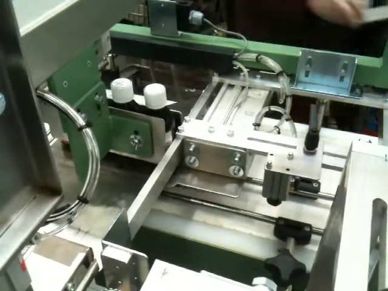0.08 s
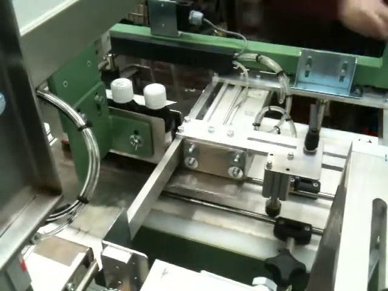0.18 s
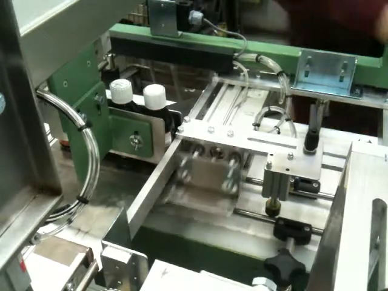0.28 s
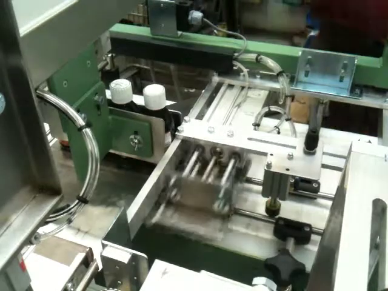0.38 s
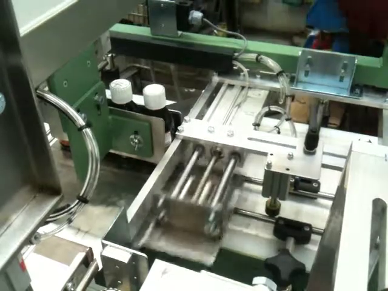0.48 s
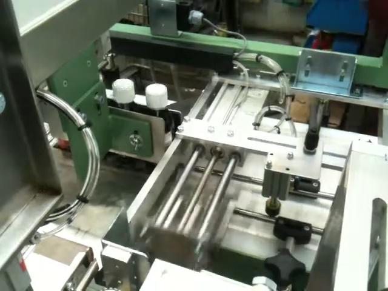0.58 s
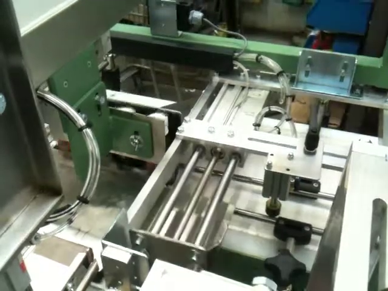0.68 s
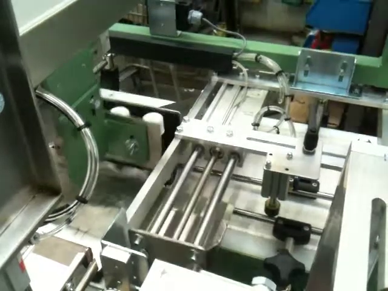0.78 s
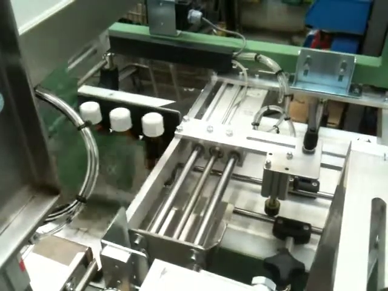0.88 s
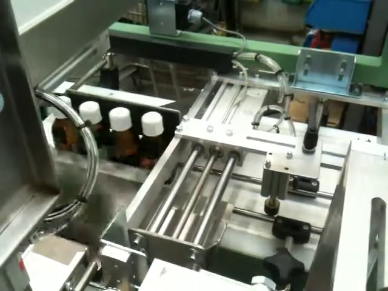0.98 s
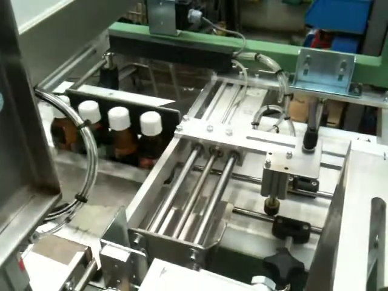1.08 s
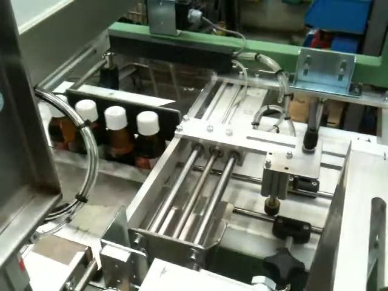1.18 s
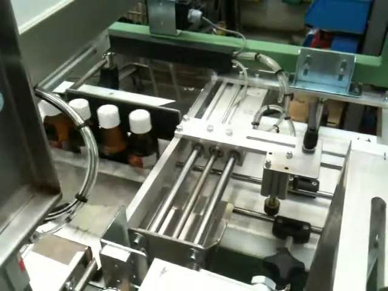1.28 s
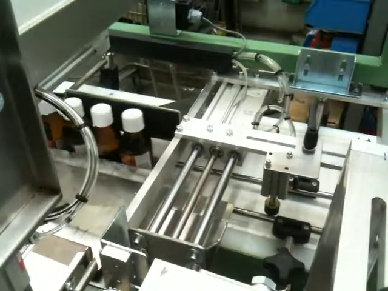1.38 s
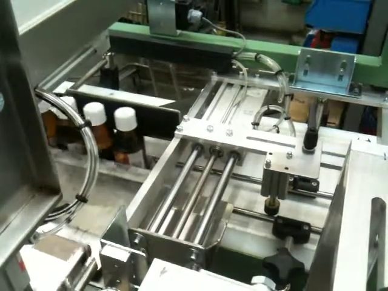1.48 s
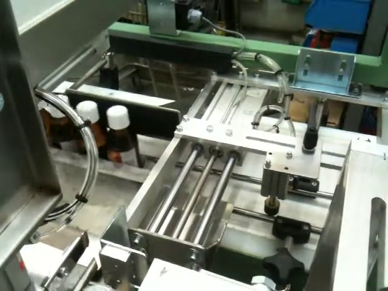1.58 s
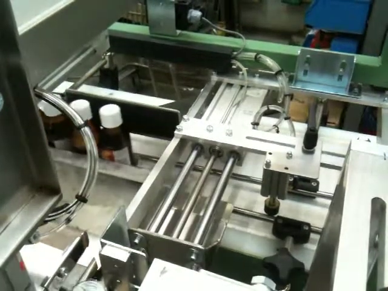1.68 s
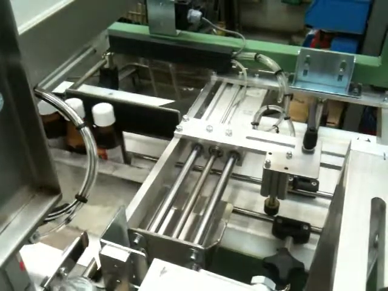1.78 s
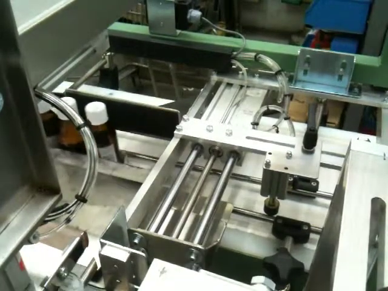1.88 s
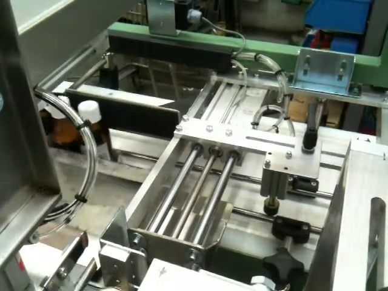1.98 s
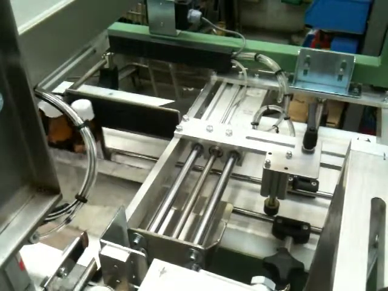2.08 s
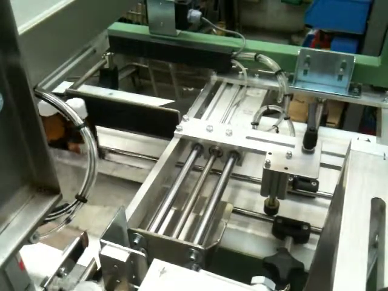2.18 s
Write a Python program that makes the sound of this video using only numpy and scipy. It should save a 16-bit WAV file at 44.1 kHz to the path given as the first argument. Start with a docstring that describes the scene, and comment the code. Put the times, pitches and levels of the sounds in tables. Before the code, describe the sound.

A pneumatic machine pushes glass bottles along metal guides. Sharp knocks and venting air start at 0.23 s, with light rattling. A hissing rush from 0.6 s ends in the loudest bang at 0.8 s, with bright glass clinks. Bottles rattle, tick and squeak until 1.4 s. An air puff at 1.5 s leads to a ringing metal clank at 1.6 s, then smaller knocks and clinks. Close, thin-bass microphone; faint workshop hum.

```python
"""A pneumatic machine shifts glass bottles along metal guides in a workshop, heard from close by.
Its knocks are noise bursts with a frame ring; valves vent and a slide rushes to its stop as coloured noise.
Blows ring a pusher plate and touches ring the bottles, both as decaying sines; clicks swell into the rattle.
Glass squeaks on the rail as wandering tones. Behind it lie the room's tail and the steady noise of the hall.
A small microphone thins the deep bass, rounds the peaks and cuts the top."""
import sys
import numpy as np
from scipy import signal
from scipy.fft import rfft, irfft
from scipy.io import wavfile
from scipy.ndimage import uniform_filter1d

SR = 44100
rng = np.random.default_rng(int(sys.argv[2]) if len(sys.argv) > 2 else 0)


def wrap_up_sound(samples):
    """Save the sound to the file named by the first command line argument, as 16-bit audio."""
    columns = np.atleast_2d(samples).T
    # keep every value between -1 and 1, then stretch to whole-number steps
    tamed = np.clip(columns, -1, 1)
    steps = np.round(tamed * 32767).astype(np.int16)
    wavfile.write(sys.argv[1], SR, steps)


N = 97020

# ringing modes of a glass bottle: f/Hz, level/dB, t60/s
BOTTLE_MODES = [(2070, -2, .1), (2230, -4, .1), (3470, -3, .12), (3517, 0, .18), (3560, -6, .1),
                (3750, -9, .12), (5042, -3, .1), (5110, -5, .07), (6150, -3, .04), (7200, -3, .06),
                (7890, -7, .06), (8950, -3, .06), (9150, -5, .05), (10600, -4, .05), (11700, -4, .06)]
# for plate blows and bottle touches: random spread of mode level, and of pitch as a fraction
MODE_SCATTER_DB, MODE_DETUNE = 2, .002


def undb(db):
    """Amplitude factor for a level in dB."""
    return 10 ** (np.asarray(db) / 20)


def unit(x):
    """Scale to an RMS of one."""
    return x / np.sqrt(np.mean(x ** 2))


def unit_energy(x):
    """Scale a response to a total energy of one."""
    return x / np.sqrt(np.sum(x ** 2))


def noise():
    """White noise over the whole scene."""
    return rng.standard_normal(N)


def decay(t, t60):
    """Exponential fade that falls 60 dB in t60 seconds."""
    return 1000. ** (-t / t60)


def band(x, hz, order=4):
    """Keep what lies between two frequencies."""
    return signal.sosfilt(signal.butter(order, hz, "bandpass", fs=SR, output="sos"), x)


def curve(rows, axis=1):
    """A column joined by straight lines in time, and a gate that is silent outside its span."""
    r, t = np.array(rows), np.arange(N) / SR
    to_nearest_end = np.minimum(t - r[0, 0], r[-1, 0] - t)
    gate = np.clip(to_nearest_end / .004, 0, 1)  # 4 ms fades
    return np.interp(t, r[:, 0], r[:, axis]), gate


def played(x, rows):
    """A steady sound made to follow a level curve."""
    db, gate = curve(rows)
    return unit(x) * undb(db) * gate


def colour(x, table):
    """Shape a spectrum by dB points joined over log frequency."""
    r = np.array(table)
    f = np.arange(N // 2 + 1) * SR / N + 1  # 1 Hz up, so that the log exists
    db = np.interp(np.log(f), np.log(r[:, 0]), r[:, 1])
    return irfft(rfft(x) * undb(db), N)


def ring(modes, scatter_db=0., detune=0., favour_hz=1000., favour_db_per_oct=0.):
    """Response of a struck object: decaying sines, weaker away from the favoured pitch."""
    t = np.arange(SR // 2) / SR
    out = np.zeros(len(t))
    for hz, db, t60 in modes:
        level_draw, pitch_draw = rng.standard_normal(2)
        octaves_off = abs(np.log2(hz / favour_hz))
        level = undb(db + scatter_db * level_draw - favour_db_per_oct * octaves_off)
        tone = np.sin(2 * np.pi * hz * (1 + detune * pitch_draw) * t)
        out += level * tone * decay(t, max(t60, .01))
    return out


def rung(x, rows, response):
    """An excitation that follows a level curve sets a ringing response going."""
    ringing = signal.fftconvolve(played(x, rows), unit_energy(response))[:N]
    return band(ringing, (600, 14000))


def add(out, s, x):
    """Place a sound at s seconds, cut off at the end of the scene."""
    i = int(s * SR)
    out[i:i + len(x)] += x[:N - i]


def knocks():
    """Each blow of the mechanism is a snap with a short crack, a thud and a ring of the frame."""
    # blows: t/s, crack level/dB, bass level/dB, treble level/dB, crack t60/s, bass t60/s, crack centre f/Hz
    blows = [(0.2333, -20, -25, -18, 0.022, 0.041, 1190), (.238, -33, -31.5, -15.5, 0.017, 0.042, 920),
             (0.3167, -21.5, -50, -19, 0.082, .06, 2250), (.355, -24, -52, -22, 0.064, .05, 1510),
             (.372, -26.5, -35.5, -38, 0.16, 0.032, 1130), (0.8009, -14, -19.5, -14.5, .14, 0.098, 1480),
             (.855, -27.5, -22.5, -26, 0.088, 0.04, 1180), (1.296, -34, -48, -47, 0.11, 0.034, 790),
             (1.535, -37, -30, -39, 0.16, 0.15, 2420), (1.599, -17.5, -30, -18, 0.066, 0.079, 834),
             (1.755, -31, -36, -43, 0.1, 0.037, 2040), (1.794, -26.5, -44, -30, 0.069, 0.048, 1960),
             (1.844, -22.5, -47, -47, 0.01, 0.041, 1850), (2.005, -33, -37.5, -33, 0.04, 0.066, 2510),
             (2.059, -22.5, -37, -39, 0.026, .06, 1410), (2.078, -45, -34, -52.5, 0.046, 0.048, 700),
             (2.097, -53, -34, -44, 0.027, 0.024, 760)]
    # ringing modes of the machine frame: f/Hz, level/dB, t60/s
    frame_modes = [(205, -2, .08), (252, -4, .12), (346, 0, .25), (528, -4, .3), (850, -12, .1),
                   (1200, -7, .18), (2350, -8, .12)]
    bass_hz, treble_hz = (162, 454), (3700, 10800)
    crack_half_width_oct, treble_fade_ratio = 0.83, 0.23
    snap_db, attack_s, shortest_t60_s = 6, .0004, .015
    frame_db = -10.5  # relative to the bass of the blow
    out, t = np.zeros(N), np.arange(SR // 2) / SR
    for s, crack_db, bass_db, treble_db, crack_t60, bass_t60, crack_hz in blows:
        width = 2 ** crack_half_width_oct
        parts = [(bass_hz, bass_db, bass_t60),
                 ((crack_hz / width, crack_hz * width), crack_db, crack_t60),
                 (treble_hz, treble_db, crack_t60 * treble_fade_ratio)]
        for hz, db, t60 in parts:
            env = (1 - np.exp(-t / attack_s)) * decay(t, max(t60, shortest_t60_s))
            # share of the full spectrum, so that narrow bands are not quieter
            share = (hz[1] - hz[0]) / (SR / 2)
            snap = undb(snap_db) * (t == 0) / np.sqrt(share) / 2
            blow = rng.standard_normal(len(t)) * env + snap
            add(out, s, undb(db) * band(blow, hz, order=2) / np.sqrt(share))
        frame = band(ring(frame_modes, 2, .002), (150, 6000), order=2)
        add(out, s, undb(bass_db + frame_db) * frame)
    return out


def vents():
    """Air leaves the valves in puffs of coloured noise."""
    # one level curve for each stretch of venting: t/s, level/dB
    puffs = [
        [(0.233, -34), (0.237, -26), (0.301, -29), (0.319, -25.5), (0.339, -29), (0.353, -27), (0.457, -38),
         (0.61, -38)],
        [(1.507, -52), (1.515, -33), (1.531, -31), (1.569, -37), (1.593, -37), (1.6, -21)],
    ]
    # spectrum of the escaping air: f/Hz, level/dB per Hz
    air_spectrum = [(180, -27), (300, -6), (667, -10), (961, -14), (1150, -6.5), (1690, -10), (2480, -10.5),
                    (3350, -17.5), (6520, 0), (12500, -9), (16000, -21)]
    return sum(played(colour(noise(), air_spectrum), puff) for puff in puffs)


def rush():
    """Hiss of the slide on its way to the stop, ringing its guide rods."""
    # the rush: t/s, level/dB
    rush_level = [(0.59, -41), (0.652, -18), (0.678, -17), (0.768, -33.5), (0.794, -33.5), (0.8, -10)]
    # spectrum of the hiss: f/Hz, level/dB per Hz
    hiss_spectrum = [(88, -52), (150, -22), (312, -13.5), (364, -17), (589, -8.5), (866, -7.5),
                     (4460, -5.5), (9450, -11), (12900, -30.5), (15000, -47)]
    # ringing modes of the guide rods: f/Hz, level/dB, t60/s
    rod_modes = [(1844, -6, .06), (2464, 0, .1), (2931, -4, .1), (3463, -5, .07), (4412, -4, .05),
                 (6652, -5, .07)]
    rods_db = -6
    hiss = played(colour(noise(), hiss_spectrum), rush_level)
    return hiss + undb(rods_db) * rung(noise(), rush_level, ring(rod_modes))


def plate():
    """Blows ring the pusher plate; the point of contact decides which modes answer most."""
    # blows on the plate: t/s, level/dB, favoured f/Hz
    plate_blows = [(1.602, -21.5, 1620), (1.602, -13.5, 7800), (1.626, -22.5, 2600), (1.656, -24, 1810),
                   (1.755, -30.5, 2260), (1.792, -32.5, 2190), (1.815, -28, 1710), (1.843, -38.5, 2440)]
    # ringing modes of the plate: f/Hz, level/dB, t60/s
    plate_modes = [(1400, -7, .08), (1531, -3, .16), (1793, 0, .18), (1850, -6, .1), (2190, -2, .12),
                   (2310, -5, .1), (2785, -3, .16), (3805, -8, .15), (6611, -12, .12), (6900, -12, .1),
                   (7620, -8, .12), (8150, -7, .18), (10770, -13, .08)]
    favour_db_per_oct = 9.5
    out = np.zeros(N)
    for s, db, hz in plate_blows:
        add(out, s, undb(db) * ring(plate_modes, MODE_SCATTER_DB, MODE_DETUNE, hz, favour_db_per_oct))
    return band(out, (600, 14000), order=2)


def clinks():
    """Every touch excites the bottle modes in its own proportions."""
    # touches: t/s, level/dB, favoured f/Hz
    touches = [(.803, -11, 7300), (.812, -22, 3515), (.812, -20, 5070), (.858, -24, 3515),
               (.931, -25.5, 4830), (.931, -31, 11000), (.98, -38, 3515), (.988, -28, 6200),
               (1.0, -30, 2120), (1.042, -38, 9000), (1.055, -32, 2080), (1.166, -36, 2080),
               (1.29, -36, 7200), (1.315, -34, 7300), (1.365, -40.5, 7200), (1.712, -55, 9000),
               (1.81, -31, 5042), (1.845, -47, 3515), (2.045, -32.5, 8900), (2.09, -42.5, 3515)]
    favour_db_per_oct = 24
    out = np.zeros(N)
    for s, db, hz in touches:
        add(out, s, undb(db) * ring(BOTTLE_MODES, MODE_SCATTER_DB, MODE_DETUNE, hz, favour_db_per_oct))
    return out


def ticks():
    """Dry ticks high in the treble: short fading bursts of noise."""
    # ticks: t/s, level/dB
    tick_rows = [(1.0385, -34), (1.1418, -27), (1.1674, -40), (1.198, -28.5), (1.284, -35), (1.3144, -38),
                 (1.3636, -39.5), (1.996, -48), (2.043, -39)]
    t60_s, tick_hz = .035, (8600, 15500)
    out, t = np.zeros(N), np.arange(SR // 10) / SR
    for s, db in tick_rows:
        burst = rng.standard_normal(len(t)) * decay(t, t60_s)
        add(out, s, undb(db) * band(burst, tick_hz))
    return out


def jostle():
    """Bottles jostling keep their modes humming: noise drives the bottle response."""
    # one level curve for each stretch of jostling: t/s, level/dB
    stretches = [
        [(0.81, -26.5), (0.872, -39), (0.908, -59), (0.994, -35.5), (1.18, -60), (1.268, -66), (1.3, -50)],
        [(1.78, -47), (1.814, -33), (1.964, -66), (2.026, -47), (2.04, -42.5), (2.094, -44.5), (2.2, -59)],
    ]
    favour_hz, favour_db_per_oct = 3515, 3.
    return sum(rung(noise(), rows, ring(BOTTLE_MODES, 0, 0, favour_hz, favour_db_per_oct))
               for rows in stretches)


def clicks(per_s, spread_db):
    """Random clicks with a long tail of loud ones."""
    present = rng.random(N) < per_s / SR
    return present * np.sign(noise()) * undb(spread_db * rng.exponential(size=N))


def rattle():
    """Bottles along the rail: dense small impacts, with bass and treble of their own level."""
    # one curve for each stretch: t/s, middle level/dB, bass above it level/dB, treble above it level/dB
    stretches = [
        [(0.317, -41.5, -8, 4), (0.377, -34.5, 0, -1), (0.401, -37, -20, -0.5), (0.445, -38, -18, -2),
         (0.491, -40, -7.5, 0.5), (0.541, -44, -28, 4.5), (0.6, -45.5, -22, 2)],
        [(0.803, -34, 13, 18), (0.853, -28, -2, -1), (0.907, -32.5, -0.5, -4), (1.081, -39.5, -4.5, -3),
         (1.193, -37.5, -6.5, -2), (1.275, -40.5, -19, -5), (1.299, -38.5, -1.5, -3), (1.359, -46.5, 1, -3),
         (1.495, -54.5, 6, -5), (1.5, -36, -3, -26)],
        [(1.603, -46.5, 17, 24), (1.681, -33, -4, 3.5), (1.729, -32, -3, -6), (1.767, -32.5, -7, -19),
         (1.811, -36, -1.5, 0), (1.935, -45.5, 1, -9.5), (2.041, -43, -5, -1.5), (2.061, -50, 16.5, -5),
         (2.073, -47, 8.5, 3.5), (2.119, -41.5, 0, -6.5), (2.2, -50.5, 4.5, -5)],
    ]
    # colour of the rattle: f/Hz, level/dB per Hz
    rail_spectrum = [(59, -30), (100, -9), (208, 3), (425, -3), (524, -4.5), (688, -4), (2130, -2.5),
                     (3250, -6.5), (9070, -7), (15000, -32.5)]
    # bands of middle, bass and treble: lower f/Hz, upper f/Hz
    rail_bands = (523, 2830), (107, 830), (3220, 16300)
    impacts_per_s, spread_db, grain_s = 2300, 2, 0.006
    grain = np.exp(-np.arange(SR // 50) / (grain_s * SR))
    size = signal.fftconvolve(np.abs(clicks(impacts_per_s, spread_db)), grain)[:N]
    middle, bass, treble = [unit(band(colour(size * noise(), rail_spectrum), hz, order=2))
                            for hz in rail_bands]
    out = np.zeros(N)
    for rows in stretches:
        out += played(middle, rows)
        out += played(bass, rows) * undb(curve(rows, axis=2)[0])
        out += played(treble, rows) * undb(curve(rows, axis=3)[0])
    return out


def wavering(hz, width_hz):
    """A tone whose size and phase wander."""
    k = int(SR / width_hz)
    a, b = (unit(uniform_filter1d(uniform_filter1d(noise(), k), k)) for _ in range(2))
    wander = a + 1j * b + .5  # the .5 is a steady part
    return unit(np.real(wander * np.exp(2j * np.pi * np.cumsum(hz) / SR)))


def squeaks():
    """Stick-slip of glass on steel: a beating pair of tones and brief glides."""
    # the long squeak: t/s, f/Hz, level/dB
    squeak_rows = [(1.1, 1265, -49), (1.125, 1288, -37), (1.15, 1375, -40.5), (1.18, 1448, -40),
                   (1.215, 1412, -37), (1.25, 1366, -36.5), (1.275, 1382, -35), (1.305, 1456, -42),
                   (1.33, 1400, -42), (1.37, 1400, -45), (1.41, 1410, -56)]
    # gliding chirps: t/s, length/s, start f/Hz, end f/Hz, level/dB
    chirp_rows = [(.44, .15, 1450, 1750, -45), (.93, .09, 1800, 3050, -36), (1.04, .055, 6250, 6600, -42),
                  (1.11, .045, 3720, 3800, -41), (1.22, .06, 6700, 6200, -50)]
    width_hz, chirp_width_hz = 75, 85
    twin_offset_hz, twin_db = -105, -1
    hz = curve(squeak_rows)[0]
    db, gate = curve(squeak_rows, axis=2)
    pair = wavering(hz, width_hz) + undb(twin_db) * wavering(hz + twin_offset_hz, width_hz)
    out = undb(db) * gate * pair
    t = np.arange(N) / SR
    for s, length, hz0, hz1, db in chirp_rows:
        u = np.clip((t - s) / length, 0, 1)  # progress through the glide
        swell = np.sin(np.pi * u) ** .5
        out = out + undb(db) * swell * wavering(hz0 + (hz1 - hz0) * u, chirp_width_hz)
    return out


def room(dry):
    """Reverberation of the workshop: a dulled, fading noise tail that starts after 8 ms."""
    level_db, t60_s, dull_hz = -17, 0.27, 5400
    t = np.arange(SR) / SR
    dull = signal.lfilter([1], [1, -np.exp(-2 * np.pi * dull_hz / SR)], rng.standard_normal(SR))
    tail = dull * decay(t, t60_s) * (t > .008)
    return undb(level_db) * signal.fftconvolve(dry, unit_energy(tail))[:N]


def hall():
    """Hum of the hall in the distance: steady coloured noise."""
    # spectrum of the hall: f/Hz, level/dB per Hz
    hall_spectrum = [(35, -72), (60, -24), (172, -13), (207, -1), (398, -17), (553, -12.5), (593, -4),
                     (903, -17.5), (2350, -20.5), (14900, -36.5), (16000, -44)]
    level_db = -49
    return undb(level_db) * unit(colour(noise(), hall_spectrum))


def scene():
    """The machine and its bottles close by, then the room and the hall behind them."""
    machine = knocks() + vents() + rush() + plate()
    bottles = clinks() + ticks() + jostle() + rattle() + squeaks()
    close = machine + bottles
    return (close + room(close) + hall())[None]


def record(dry):
    """A small microphone without deep bass; the loudest peaks are rounded and the top is cut."""
    low_hz, top_hz, peak_limit = 81.4, 16000, .9
    x = signal.sosfilt(signal.butter(2, low_hz, "highpass", fs=SR, output="sos"), dry)
    x = peak_limit * np.tanh(x / peak_limit)
    return signal.sosfilt(signal.ellip(10, .2, 80, top_hz, fs=SR, output="sos"), x)


dry = scene()
out = record(dry)
wrap_up_sound(out)
```